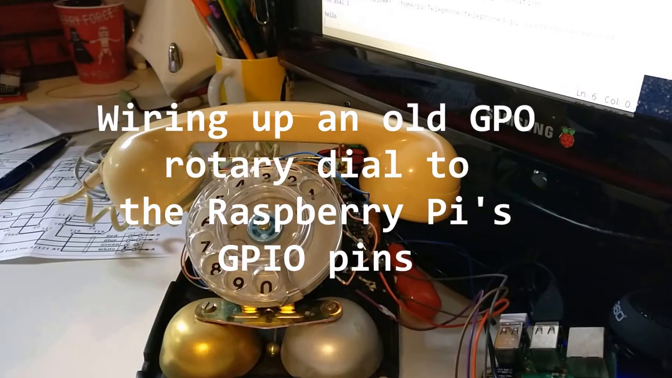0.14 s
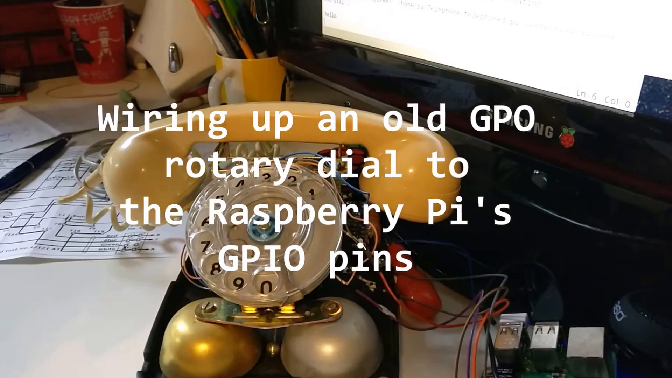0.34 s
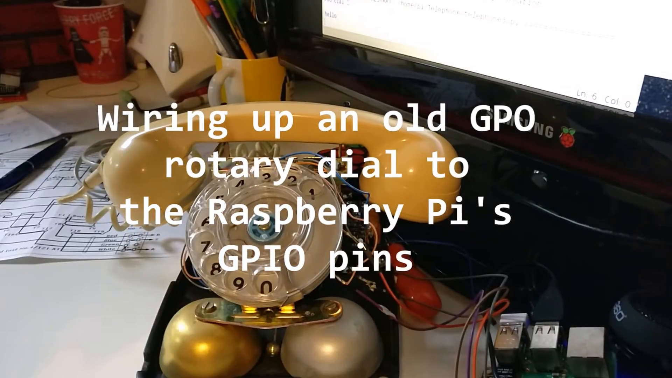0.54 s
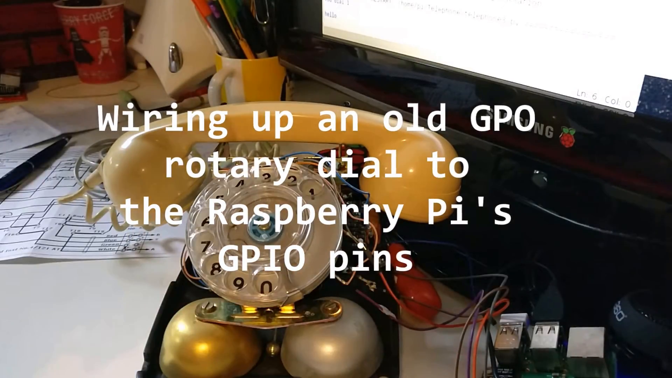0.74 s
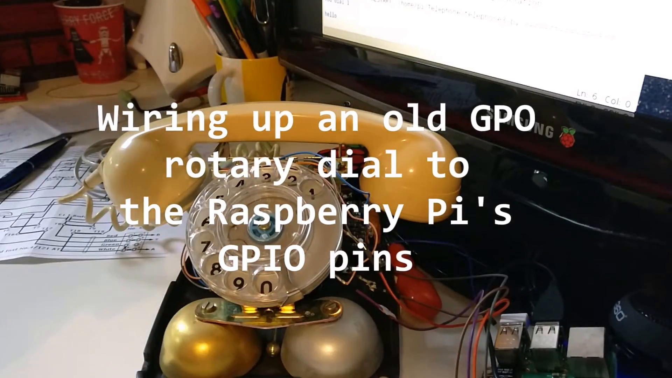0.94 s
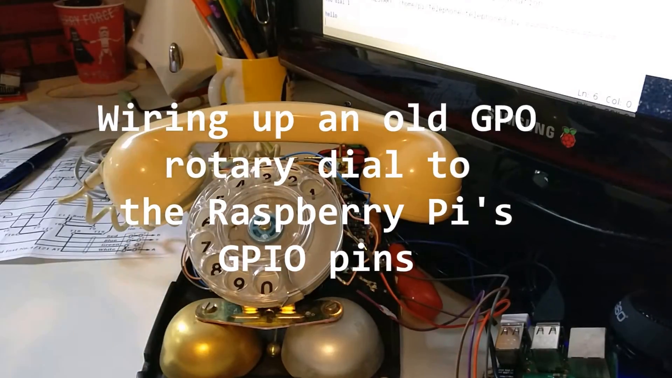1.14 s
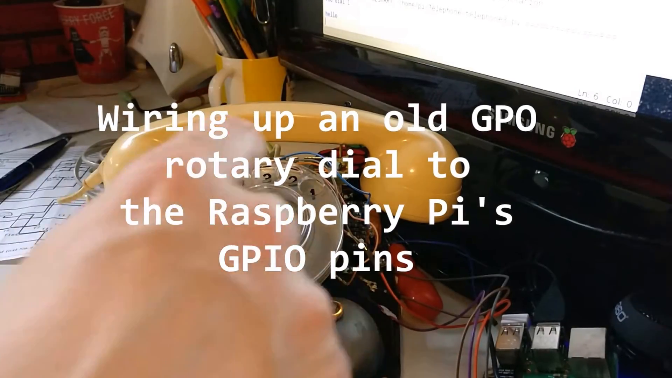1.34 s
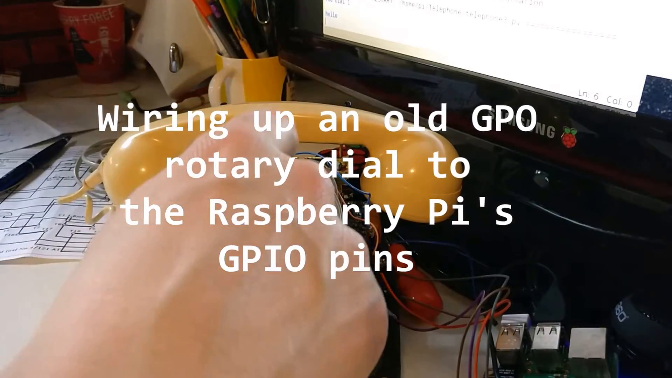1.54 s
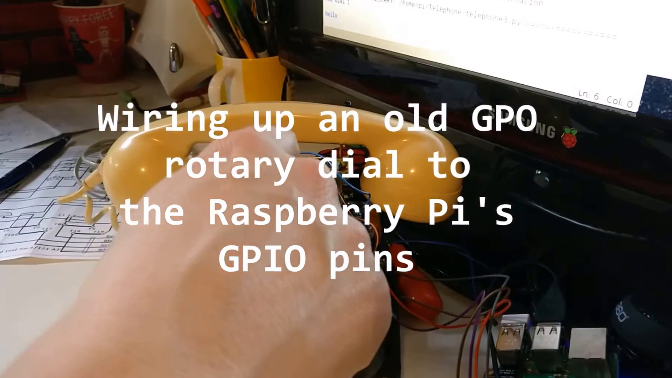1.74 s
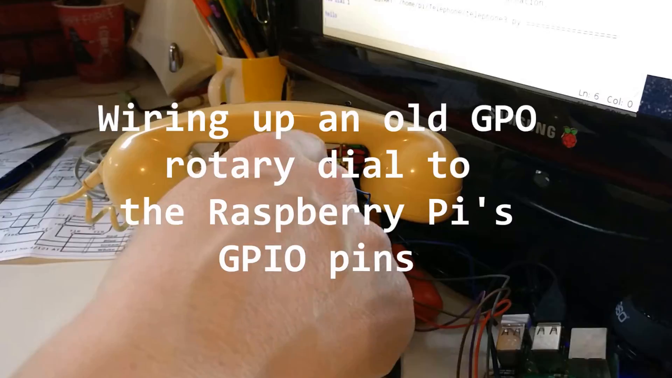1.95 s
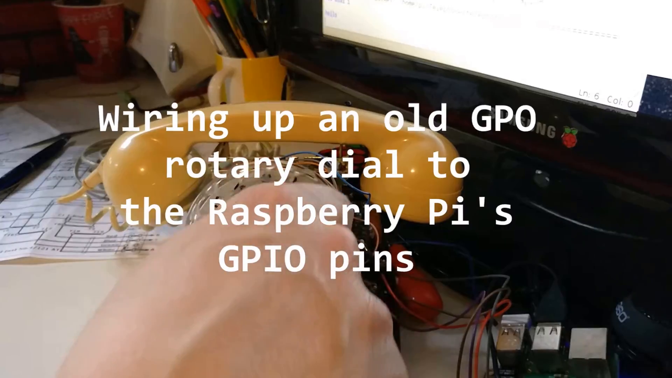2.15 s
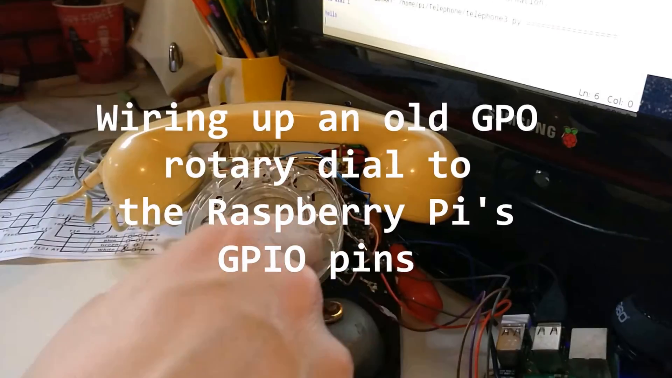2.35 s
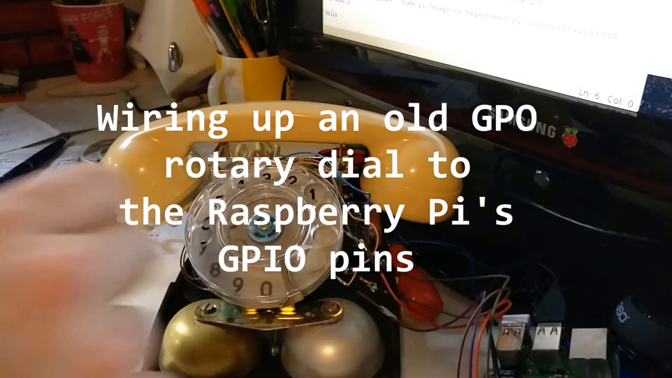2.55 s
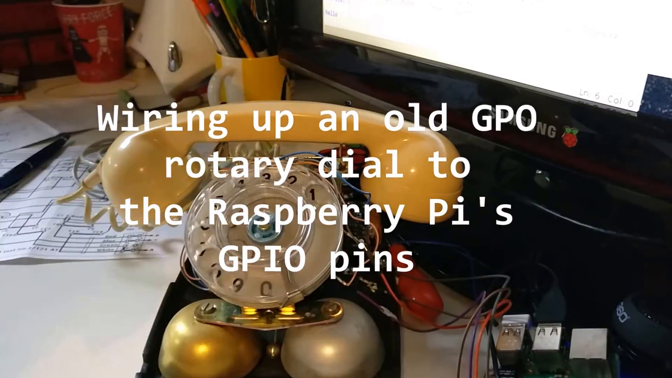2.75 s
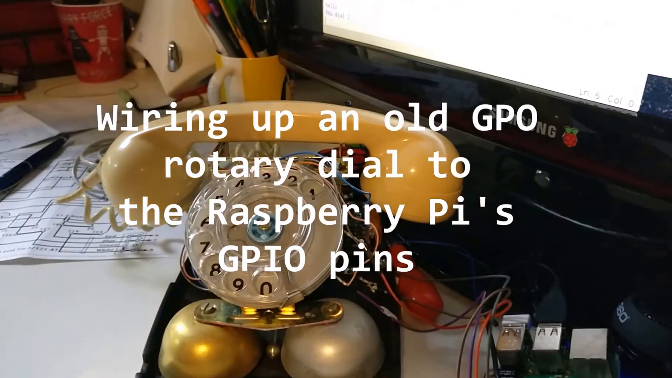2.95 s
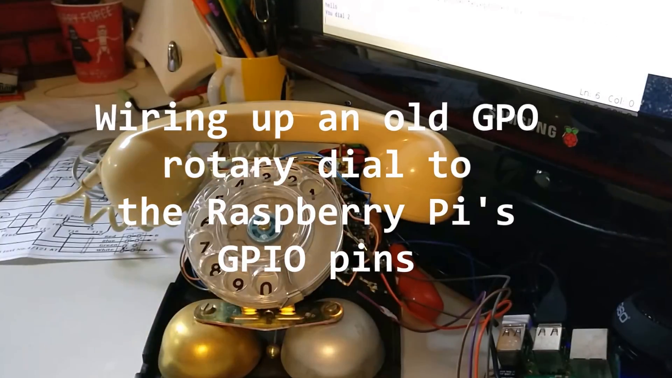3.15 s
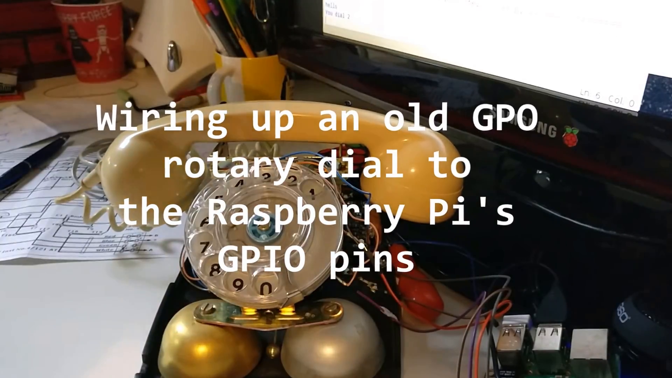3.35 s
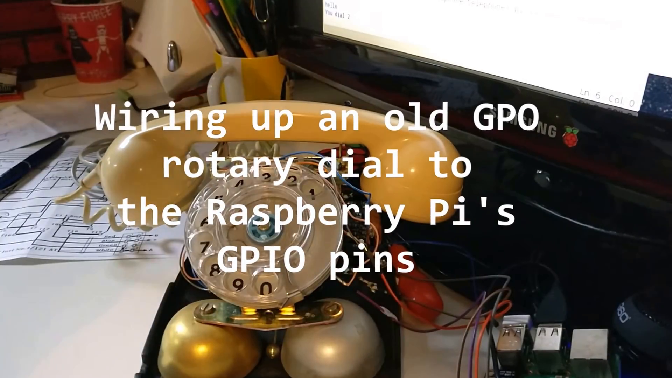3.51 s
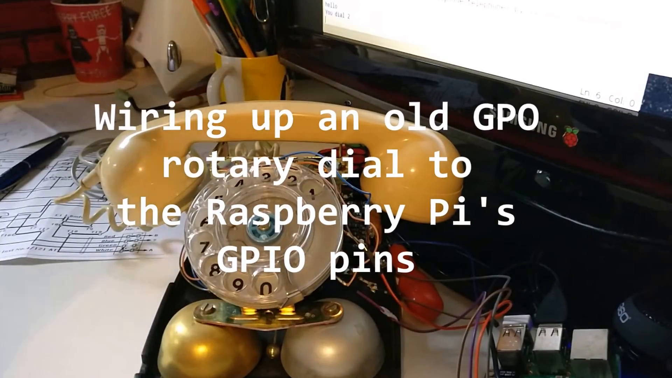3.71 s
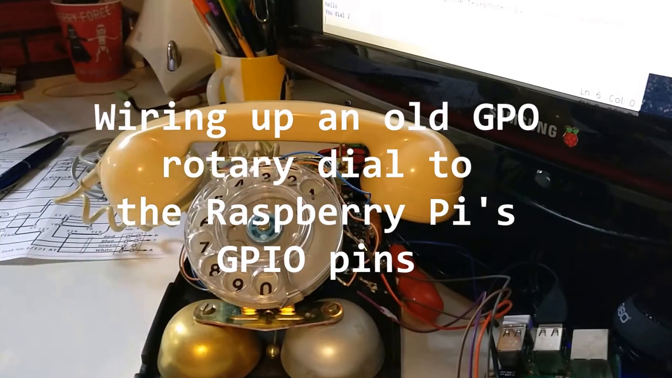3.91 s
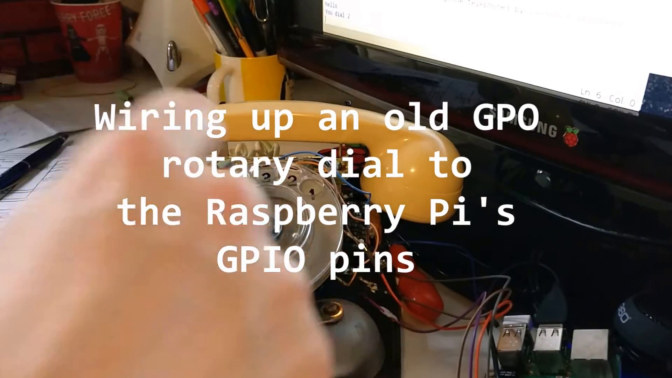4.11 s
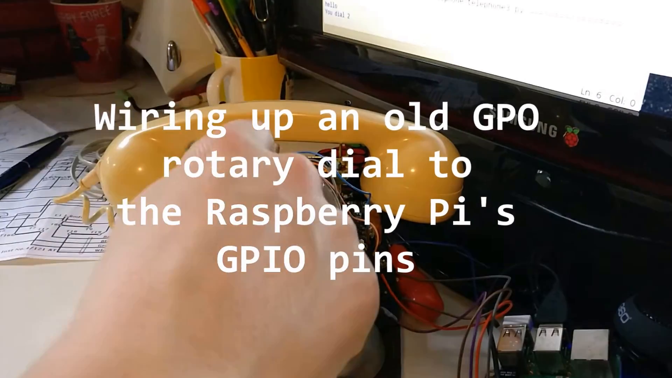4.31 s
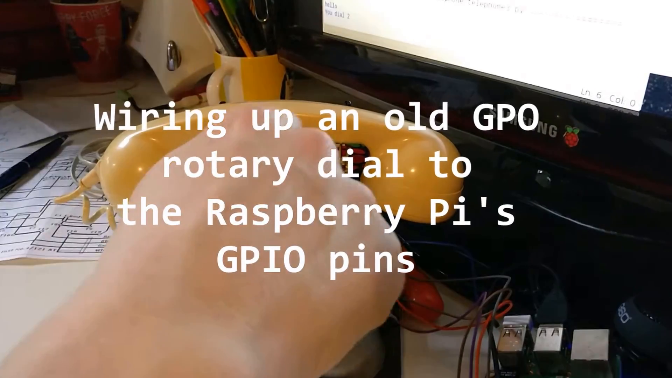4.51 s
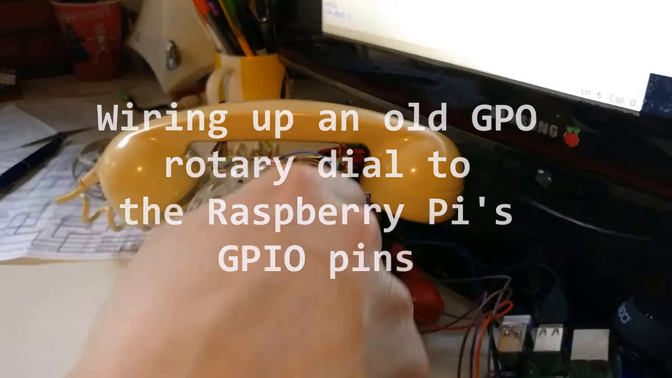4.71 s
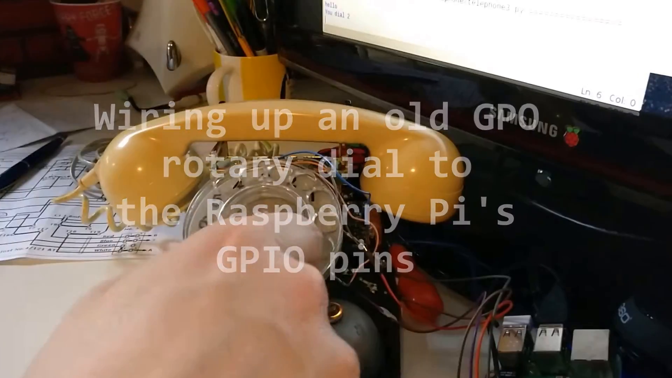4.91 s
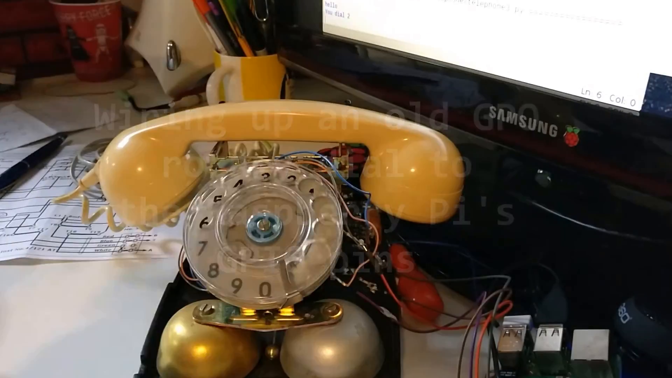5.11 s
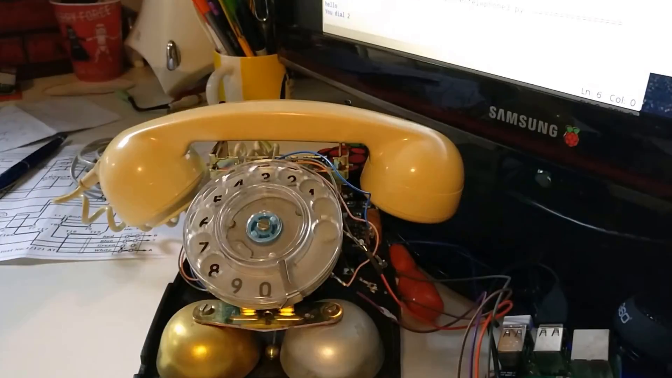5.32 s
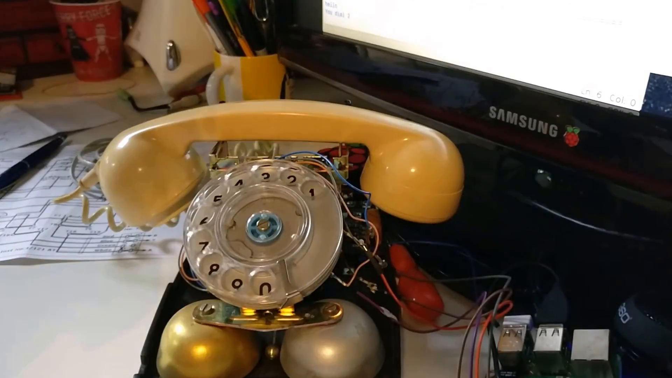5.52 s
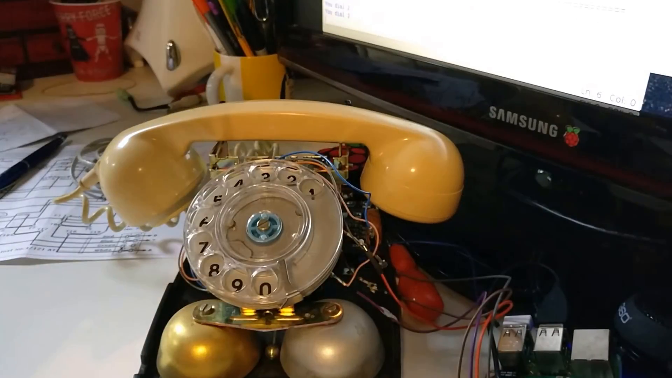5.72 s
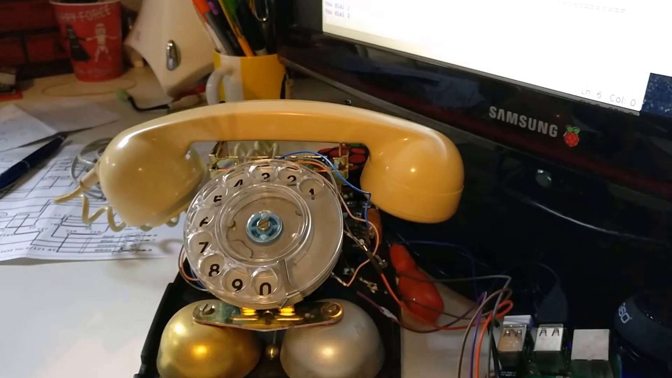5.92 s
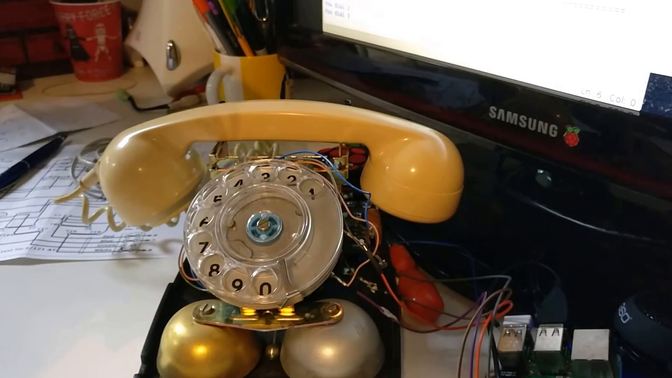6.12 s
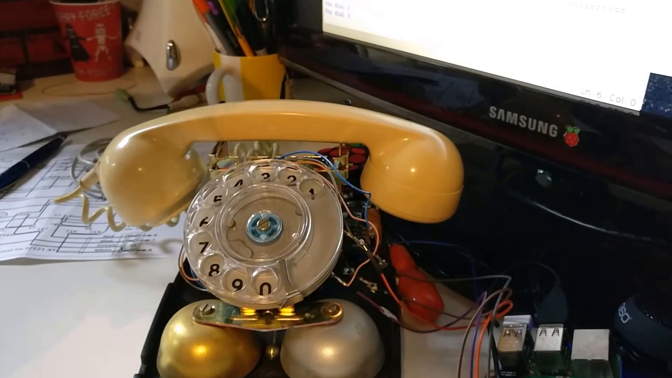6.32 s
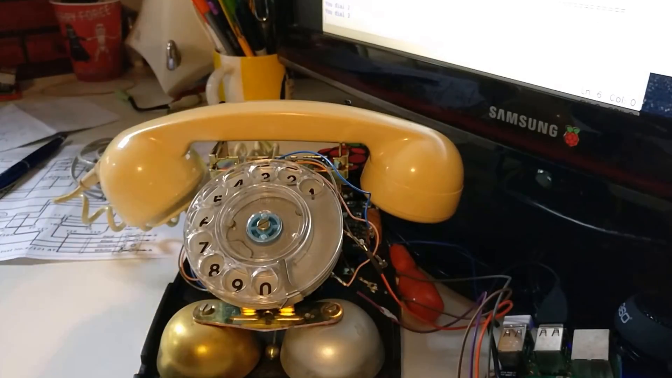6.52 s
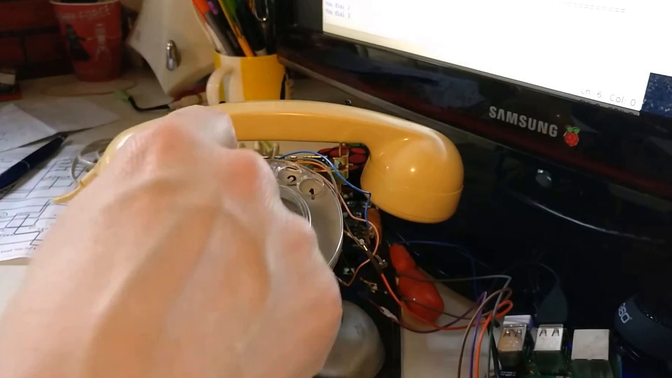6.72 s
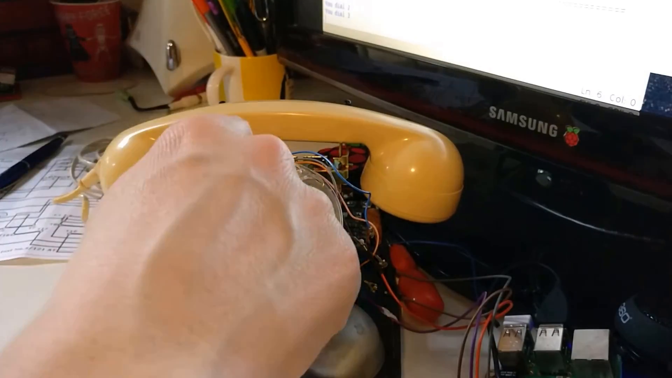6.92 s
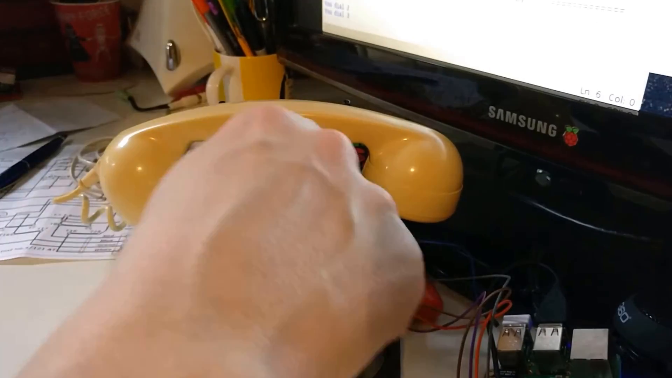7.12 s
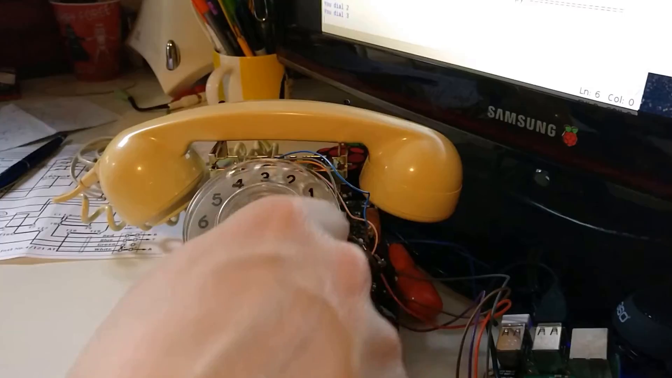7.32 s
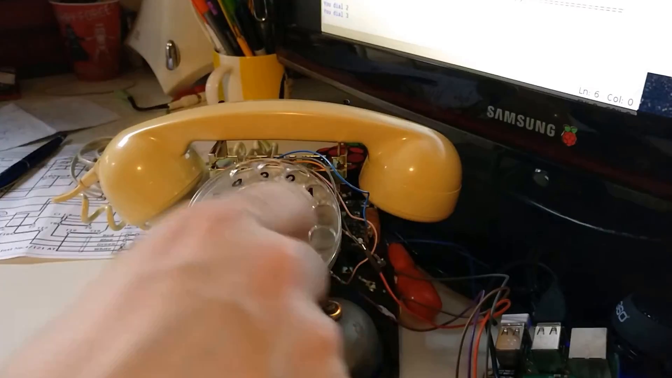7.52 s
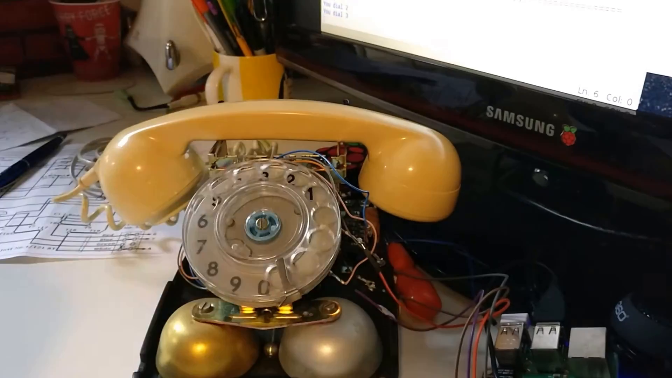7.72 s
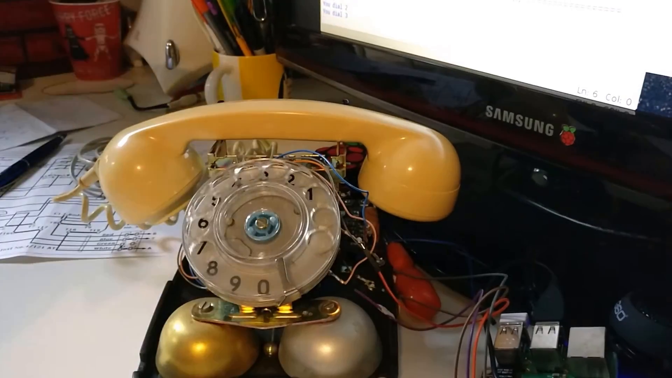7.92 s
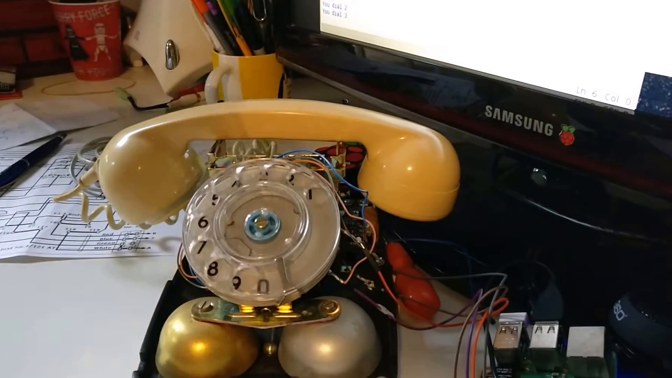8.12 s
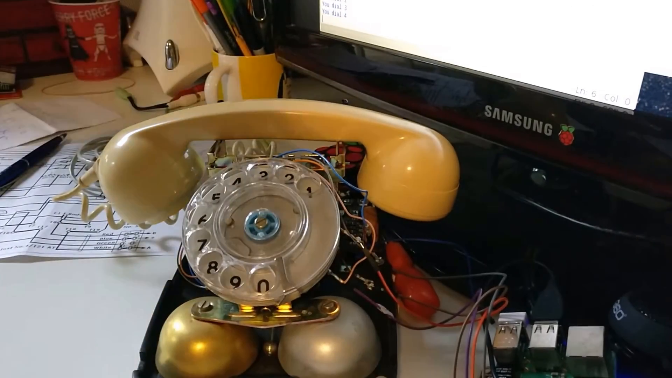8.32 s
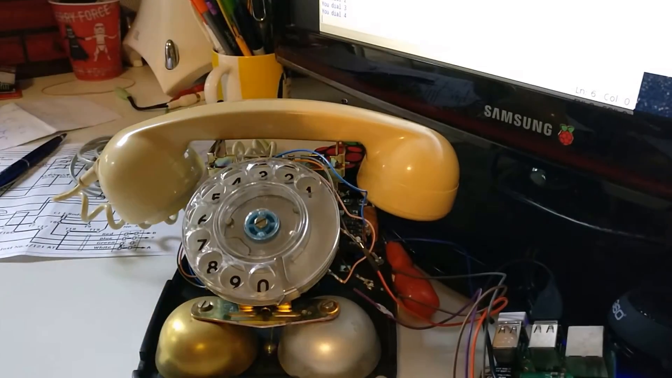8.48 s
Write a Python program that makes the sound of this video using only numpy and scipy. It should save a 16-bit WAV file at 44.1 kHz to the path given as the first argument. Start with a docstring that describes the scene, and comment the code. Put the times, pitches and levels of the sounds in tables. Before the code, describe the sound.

A quiet small room with low rumble and faint hiss, heard close to an opened rotary telephone on a desk. At 0 s the wheel rattles lightly to rest, with faint handling rustles at 0.4 and 1.4 s. At 1.85 s a palm settles dully and a finger knocks into the wheel near 2 s. A bright spring snap at 2.15 s leads into quick ratchet ticks and a hard stop at 2.34 s. Released at 2.5 s, the gears whirr with rapid fine ticks and a low steady hum, clacking home at 3 s and rocking briefly. After a pause, the second digit starts with a palm at 4.4 s, winds at 4.7-4.9 s and whirrs from 5.06 to 5.63 s. The third, with a firmer palm thump at 6.9 s, winds at 7.2-7.47 s, runs back from 7.6 to 8.3 s, clacks and settles.

```python
"""Three digits are dialled on an opened rotary telephone on a desk in a quiet room with low rumble and faint hiss.
At first the wheel rattles to rest, as filtered bursts of noise. For each digit a palm settles as dull noise,
a finger lands in the wheel, a contact spring snaps over, and the ratchet ticks, as ringing noise bursts, to the stop.
Released, the wheel runs home: the gears whirr as chattering noise, the governor ticks twice a turn and hums through
the desk as harmonics of its rotation, and the wheel clacks home and rocks twice in its play."""
import sys
import numpy as np
from scipy import signal
from scipy.fft import rfft, irfft
from scipy.io import wavfile
from scipy.ndimage import uniform_filter1d

SR = 44100
rng = np.random.default_rng(int(sys.argv[2]) if len(sys.argv) > 2 else 0)


def to_wav(s):
    """Save 16-bit WAV."""
    ch = np.atleast_2d(s).T  # columns
    pcm = np.round(np.clip(ch, -1, 1) * 32767)  # PCM
    wavfile.write(sys.argv[1], SR, pcm.astype(np.int16))


N = 377055
TIME = np.arange(N) / SR  # s
BINS = np.fft.rfftfreq(N, 1 / SR)  # Hz

# Resonances and hollows of wheel, frame and case, and a bright peak near 15.3 kHz mostly on the right:
# centre_hz, width_hz, left_db, right_db
BODY_MODES = [(302, 40, 0.9, 3.3), (404, 64, -2.7, -3.0), (497, 69, 0.3, 3.5), (605, 51, -1.3, -6.8),
              (714, 102, -0.5, 2.7), (940, 170, 3, 9), (1033, 150, 5, -1), (1263, 129, -4.6, -4.9),
              (1434, 169, -2.3, -4.5), (1697, 215, 6.8, 6.8), (1909, 114, 2.1, 4.7), (2313, 113, 6.0, 0.9),
              (2582, 333, 6.4, 4.1), (3280, 1448, 8.2, 2.4), (3871, 231, -4.0, -3.4), (4248, 491, 3.1, 2.3),
              (5337, 647, 0.8, 4.3), (6087, 535, 2.2, 3.4), (6549, 210, -2.9, -2.0), (6822, 282, 3.2, 3.1),
              (7693, 715, -3.6, -3.6), (9154, 541, -2.3, -2.3), (9566, 403, -1.4, 3.2),
              (9611, 5878, 4.2, 0.4), (11269, 563, -3.8, -2.1), (12395, 464, -3.7, -1.8),
              (13551, 289, -1.5, 2.5), (15323, 587, 1.0, 7.5)]
# Broad colour of the gear teeth in contact: pitch_hz, left_db, right_db
WHIRR_COLOUR = [(150, -12, -16), (260, -11, -22), (430, -17.5, -18), (556, -16, -11.5), (833, -8, -6),
                (1400, -7, -11.5), (1820, -7, -3.5), (3460, -9.5, -4.5), (5900, -6, -5.5), (7800, -12, -13),
                (10000, -4, -13), (11800, -5, -19), (14900, -4, -17)]
# Broad colour of pawl, spring and bearing: pitch_hz, left_db, right_db
RATCHET_COLOUR = [(150, -20, -20), (250, -32, -39.5), (395, -17, -8), (580, -12, -16), (864, -6, 3.5),
                  (1380, -6, -18.5), (1820, -4.5, -3), (3250, -4, 2.5), (5700, -1.5, -1.7), (8200, -5, -5),
                  (9900, 2, -7.3), (12500, -5, -14), (15500, 0.5, -8)]
# Broad colour of the contact spring and of metal cracking: pitch_hz, left_db, right_db
SNAP_COLOUR = [(150, -40, -27), (250, -25, -21), (400, -31, -16.5), (593, -12, -12), (840, -25, -6.5),
               (1380, -25.6, -18), (1900, -12, -13), (3200, -18.5, -11), (5800, -4.5, -11),
               (7400, -14.5, -7), (10000, -5, -15), (12400, -6.5, -18), (15000, -0.5, -6)]
# Broad colour of knocks: pitch_hz, left_db, right_db
KNOCK_COLOUR = [(150, -23, -11), (270, -1.5, -13.5), (430, -37, -14), (625, -6.5, -5.5), (850, -.5, .5),
                (1440, -5, -9), (1810, -2, -3), (3320, -7.5, -.5), (5600, -2.5, -2), (7500, -6, -6),
                (10000, -2.5, -9.5), (12600, 0, -9), (15200, -2, -11)]
# Bright tick of the governor's worm: pitch_hz, left_db, right_db
WORM_COLOUR = [(1500, -41, -33), (3940, -24, -29), (8350, -18, -26), (10300, -2.5, -22), (15600, -8, -6)]
# Colour of skin on the wheel: pitch_hz, left_db, right_db
SKIN_COLOUR = [(150, -12, -12), (330, -3, -3), (550, 0, -1), (850, 0, -2), (1100, -12, -14),
               (2000, -24, -24), (5000, -24, -26), (15000, -34, -36)]
# Left-right likeness of the dial's sound: pitch_hz, correlation (no unit), left_lead_rad
DIAL_LIKENESS = [(130, 1, 0), (480, .7, .1), (850, .85, 1.3), (1020, .85, 3), (1350, .2, 1.5),
                 (1650, .6, 1), (2000, .4, 2.6), (2650, .4, 2.6), (3200, .1, 1.5), (3900, .2, 2.5),
                 (4250, .7, 3.1), (4700, .25, 2.5), (5800, .3, .6), (8000, .2, .5), (15000, .2, 2)]
# Modes of the governor's brake cup: pitch_hz, t60_s, left_db, right_db
CUP_MODES = [(885, .035, 0, 4), (960, .045, -5, 13), (1040, .04, 15, -6), (1136, .035, 6, -6),
             (1192, .03, 1, -8), (2320, .035, -3, -12)]
# Modes of the case on the desk: pitch_hz, decay_s, level_db
CASE_MODES = [(116, .027, 0), (170, .03, -8), (203, .03, -8), (345, .022, -25), (715, .018, -20)]
# Colour of the desk under a hand: pitch_hz, level_db
DESK_COLOUR = [(30, -22), (60, -4), (88, -7), (116, 9), (145, -10), (190, -8), (270, -13.5), (450, -16),
               (800, -13), (1500, -27), (4000, -71)]
# Colour of the room background: pitch_hz, relative level_db per Hz
AIR_COLOUR = [(12, -37), (20, -12.5), (32, 3), (49, -2.5), (61, -7.5), (70, -15), (101, -11.5), (158, -17),
              (301, -23.5), (367, -31), (399, -29.5), (698, -30.5), (3630, -31.5), (8180, -40.5),
              (16000, -31.5)]
# Left-right likeness of the room background: pitch_hz, correlation (no unit)
AIR_LIKENESS = [(60, 0.75), (180, 0.15), (550, 0.13), (1650, 0.055), (4970, -0.041), (15000, 0.1)]
# Reverberation of the room: pitch_hz, t60_s, tail_db
ROOM_DECAY = [(120, 0.8, -2), (604, 0.37, 3.5), (980, 0.5, 1), (1810, 0.43, 1), (2900, 0.32, 1.5),
              (5900, 0.33, -1), (15300, 0.18, 3.5)]

# All event levels below are relative: each source sets its own gain.
# Hand settling on the telephone before each digit: start_s, length_s, rumble_db, desk_thump_db
RESTS = [(1.85, .12, -67, -64), (4.4, .15, -62.5, -61), (6.919, .15, -55.5, -49)]
# Finger dropping into its hole and bouncing once: start_s, level_db, desk_thump_db, bounce_after_s
TOUCHES = [(1.9784, -25, -60, .041), (4.5537, -25, -45.5, .046), (7.0959, -25, -57, .0264)]
# Fingertip tapping and sliding on the wheel: start_s, length_s, level_db
BRUSHES = [(2.04, .1, -61), (4.391, .02, -70), (4.451, .01, -62), (4.6, .07, -69), (6.908, .015, -69),
           (6.964, .008, -67), (7.13, .06, -63)]
# Wheel wound to the finger stop: leaves_home_s, first_tooth_s, time_per_tooth_s, stop_s, stop_db
PULLS = [(2.149, 2.1601, .0187, 2.3419, -20), (4.6948, 4.7372, .0177, 4.9105, -20),
         (7.1926, 7.2692, .01786, 7.4714, -20)]
# Wheel running home: finger_slips_s, gears_catch_s, last_cam_clack_s, home_s, hum_hz (two beats a turn)
RUNS = [(2.5135, 2.5506, 2.968, 2.9886, 124.3), (5.0605, 5.0784, 5.6061, 5.6258, 124.3),
        (7.6227, 7.6532, 8.2607, 8.293, 124.5)]
# Wheel rocking in its play once home: start_s, level_db, second_after_s, second_db
SETTLES = [(.0472, -39.5, .045, -46.5), (3.0974, -41.5, .046, -53), (5.7364, -33.5, .028, -43.5),
           (8.4038, -39, .019, -44)]
# Light knocks on case and wheel: start_s, level_db, desk_thump_db, decay_s
NUDGES = [(.0024, -48, -50, .024), (2.4577, -40.5, -71, .0071), (2.484, -47, -72, .005),
          (2.526, -42, -68, .005), (4.898, -27.5, -56, .007), (4.944, -41, -62, .005),
          (7.025, -47, -46, .0025), (7.0498, -44, -54, .0045), (7.2445, -40, -66, .002),
          (7.459, -29, -60, .006), (7.607, -46, -70, .005), (8.281, -25, -52, .005)]
# Rustles of handling nearby: start_s, level_db, rise_s, fade_s, centre_hz, width_hz
RUSTLES = [(.04, -66, .005, .2, 2750, 1300), (.397, -63, .005, .015, 2750, 1000),
           (1.418, -69, .004, .015, 3500, 5000), (3.855, -65, .045, .018, 11000, 11000)]

# Blows that every run shares: level_db, desk_thump_db, decay_s
SLIP, CATCH = (-40, -60, .007), (-33.5, -53, .0098)
LAST_CLACK, HOME = (-28, -52, .009), (-20.8, -37, .0063)
TOUCH_DECAY_S, BOUNCE_DB = .0052, -13.5
STOP_THUMP_DB, STOP_DECAY_S = -51, .0068
SETTLE_DECAY_S, SETTLE_THUMP_DB = .019, -26

# The gears speed up just before they catch, grow louder towards home and stop dead
GEARS_DB, GEARS_GROWTH_DB = -38.1, 2.7
GEARS_LEAD_S, GEARS_RISE_S, GEARS_FADE_S = .035, .038, .006
# The governor starts a fraction flat; its hum weakens as the spring unwinds
SPIN_UP_S, START_FLAT = .05, .04
HUM_DB, HUM_SAG_DB = -40.8, -1.8
HUM_DELAY_S, HUM_RISE_S, HUM_FADE_S = .002, .03, .022
# Time per lobe of the pulse cam, and how it checks the governor near home
CAM_S, CAM_BRAKE_DB, CAM_BRAKE_REACH_S = .096, -9, .17

TOOTH_DB, TOOTH_GROWTH_DB, TOOTH_SPREAD_DB, FIRST_TOOTH_DB = -27.6, 2, 1, -4.5
RUB_DB, RUB_GROWTH_DB, RUB_FADE_S, SLACK_RUB_DB = -46, 3, .04, -53
# A faint noise swells just before the wheel leaves home, and fades while it rests on the stop
FAINT_DB, FAINT_LEAD_S, FAINT_EASE_DB = -61, .03, -8
SNAP_DB, STOP_CRACK_DB, HOME_CRACK_DB = -14.3, -26, -23
HOLD_DB, HOLD_EASE_DB, PUSH_DB = -60.5, -2.5, -59.5
HAND_RISE_S, HAND_FADE_S, PALM_HZ = .012, .03, 160
AIR_DB = -65
EDGE_HZ = 15850


def amp(db):
    """Decibel law: a level becomes an amplitude gain."""
    return 10 ** (np.asarray(db) / 20)


def unit(x):
    """Normalisation: the signal is scaled to rms 1."""
    return x / np.sqrt(np.mean(x ** 2) + 1e-20)


def read(points, hz, axis=1):
    """Interpolation: one table column is joined by straight lines over log frequency."""
    table = np.array(points, float)
    return np.interp(np.log(hz + 1), np.log(table[:, 0] + 1), table[:, axis])


def wander(hz):
    """Low-passed noise: a slow random variation of rms 1, up to about hz."""
    return unit(irfft(rfft(rng.standard_normal(N)) / (1 + (BINS / hz) ** 4), N))


def noise_pair(likeness, gain=1, lead=0):
    """Partial coherence: stereo noise correlated as the table says, the left ahead by lead radians."""
    same = np.clip(read(likeness, BINS), -1, 1)
    left, other = rfft(rng.standard_normal((2, N)))
    right = same * left * np.exp(-1j * lead) + np.sqrt(1 - same ** 2) * other
    return unit(irfft(np.array([left, right]) * gain, N))


def add(mix, start_s, sound):
    """Superposition: a sound is added to the mix from its start time."""
    part = mix[max(round(start_s * SR), 0):][:len(sound)]
    part += sound[:len(part)]


def burst(rise, decay):
    """Contact envelope: a chattering contact rises quickly to 1, then decays exponentially (s)."""
    t = TIME[:SR // 4]
    shape = (1 - np.exp(-(t / rise) ** 2)) * np.exp(-t / decay)
    return shape / shape.max()


def stroke(start, end, rise, fade, growth_db=0):
    """Sustained contact: a movement's gain swells, changes steadily in level, then dies away (s)."""
    length = end - start
    t = TIME[:round((length + 8 * fade) * SR)]
    shape = (1 - np.exp(-(t / rise) ** 2)) * np.exp(-np.maximum(t - length, 0) / fade)
    gain = np.zeros(N)
    add(gain, start, shape * amp(growth_db * np.minimum(t / length, 1)))
    return gain


def ring(force, colour, size=4096):
    """Source and filter: tiny random impacts of the given strength excite the telephone's resonances."""
    hz = np.fft.rfftfreq(size, 1 / SR)
    db = np.array([read(colour, hz, axis=1), read(colour, hz, axis=2)])
    for centre, width, left_db, right_db in BODY_MODES:
        db += np.outer([left_db, right_db], 1 / (1 + (2 * (hz - centre) / width) ** 2))
    log_gain = np.log(amp(np.hstack([db, db[:, -2:0:-1]])))
    # minimum phase: the resonances ring after the impact, never before
    response = np.fft.ifft(np.exp(np.conj(signal.hilbert(log_gain)))).real
    response = unit(response) / np.sqrt(size)
    impacts = force * noise_pair(DIAL_LIKENESS, lead=read(DIAL_LIKENESS, BINS, axis=2))
    return signal.oaconvolve(impacts, response, axes=1)[:, :N]


def shifting(x, depth_db, patch_hz=330, patch_s=.07):
    """Moving contact: as other spots touch, each resonance swells and fades in its own time."""
    z = signal.stft(x, nperseg=512)[2]
    field = rng.standard_normal(z.shape[1:])
    # smooth the random gains over frequency bins, then over time frames
    for axis, span in ((0, patch_hz * 512 / SR), (1, patch_s * SR / 256)):
        field = uniform_filter1d(field, max(round(span), 1), axis)
        field = uniform_filter1d(field, max(round(span / 2), 1), axis)
    return signal.istft(z * amp(depth_db * unit(field)), nperseg=512)[1][:, :N]


def governor_turns(waver=0.0062):
    """Speed regulation: the governor spins up, holds near 62 turns a second, and its turns are counted."""
    hz = np.zeros(N)
    for slip, catch, _, _, hum_hz in RUNS:
        running = TIME >= slip
        hz[running] = hum_hz * (1 - START_FLAT * np.exp(-(TIME[running] - catch) / SPIN_UP_S))
    return np.cumsum(hz / 2 * (1 + waver * wander(17.5))) / SR


def gear_drive():
    """Driving force: the strength of the gear train while the wheel runs home."""
    return amp(GEARS_DB) * sum(
        stroke(catch - GEARS_LEAD_S, home, GEARS_RISE_S, GEARS_FADE_S, GEARS_GROWTH_DB)
        for _, catch, _, home, _ in RUNS)


def cam():
    """Periodic load: the pulse cam's lobes (1 on each, 0 between) and the time to the nearest homing (s)."""
    homes = np.array([home for _, _, _, home, _ in RUNS])
    from_home = abs(TIME - homes[:, None]).min(0)
    return (1 + np.cos(2 * np.pi * from_home / CAM_S)) / 2, from_home


def whirr(turns, decay=0.0011, scrape=.35, turn_db=.8, beat_db=.5, cam_db=.9, uneven_db=.4, shift_db=1.3):
    """Amplitude modulation: chattering, scraping teeth swell with governor turns, weights and cam lobes."""
    impacts = (rng.random(N) < 900 / SR) * rng.uniform(.2, 1, N)  # about 900 a second
    # the impacts add as energy, hence the root
    chatter = np.sqrt(signal.lfilter([1], [1, -np.exp(-2 / (decay * SR))], impacts))
    swell_db = turn_db * np.cos(2 * np.pi * turns) + beat_db * np.sin(4 * np.pi * turns)
    swell_db += cam_db * cam()[0] + uneven_db * wander(35)
    force = unit(np.hypot(unit(chatter), scrape) * amp(swell_db))
    return shifting(ring(force * gear_drive(), WHIRR_COLOUR), shift_db)


def hum(turns, once_db=-26, thrice_db=-32, fifth_db=-28, waver_db=0.95):
    """Rotating imbalance: two weights shake the case twice a turn; cam lobes check them more near home."""
    angle = 2 * np.pi * turns
    orders = np.sin(2 * angle) + amp(once_db) * np.sin(angle)
    orders += amp(thrice_db) * np.sin(3 * angle) + amp(fifth_db) * np.sin(5 * angle)
    shake = sum(stroke(catch + HUM_DELAY_S, home, HUM_RISE_S, HUM_FADE_S, HUM_SAG_DB)
                for _, catch, _, home, _ in RUNS)
    lobe, from_home = cam()
    brake_db = CAM_BRAKE_DB * lobe * np.exp(-from_home / CAM_BRAKE_REACH_S)
    return np.sqrt(2) * orders * shake * amp(HUM_DB + brake_db + waver_db * wander(48))


def governor(turns, worm_db=-6.5, uneven_db=2.8, early_turn=.23, early_db=-2.5, tick_rise=.0012,
             tick_decay=.0028, grip=0.0019, cup_db=-11, shift_db=2.3):
    """Impulsive excitation: each turn the worm ticks twice and a brake shoe catches and rings its cup."""
    at, early = (np.flatnonzero(np.diff(np.floor(turns + ahead))) for ahead in (0, early_turn))
    strikes, catches = np.zeros((2, N))
    strikes[at], strikes[early] = 1, amp(early_db)
    strikes *= amp(uneven_db * rng.standard_normal(N))
    tick_energy = signal.oaconvolve(strikes ** 2, burst(tick_rise, tick_decay) ** 2)[:N]
    ticks = unit(np.sqrt(abs(tick_energy)))
    worm = amp(worm_db) * ring(ticks * gear_drive(), WORM_COLOUR)

    # the shoe catches up to 100 samples before the worm's later tick
    catches[at + rng.integers(0, 100, len(at)) - 100] = rng.uniform(.3, 1, len(at))
    t = TIME[:SR // 4]
    # the shoe grips softly, so the cup rings without a click
    modes = sum(np.outer(amp([left_db, right_db]),
                         np.sin(2 * np.pi * hz * t) * burst(grip, t60 / np.log(1000)))
                for hz, t60, left_db, right_db in CUP_MODES)
    cup = amp(cup_db) * unit(signal.oaconvolve(catches[None], modes, axes=1)[:, :N])
    # it lets go at the cam's last clack
    braking = amp(GEARS_DB) * sum(stroke(slip, clack, GEARS_RISE_S, GEARS_FADE_S, GEARS_GROWTH_DB)
                                  for slip, _, clack, _, _ in RUNS)
    return worm + shifting(cup * braking, shift_db, patch_hz=170, patch_s=.045)


def winding(tooth_db=-7, rise=0.0014, decay=0.0085, grain_db=2.5, shift_db=1.5):
    """Impact and friction: the wheel rubs through its slack, then the pawl ticks over harder rubbing."""
    ticks, rub = np.zeros((2, N))
    for (start, first, step, stop, _), (slip, *_) in zip(PULLS, RUNS):
        teeth = np.arange(first, stop - step / 2, step)
        for tooth, chance in zip(teeth, rng.standard_normal(size=16)):
            db = TOOTH_DB + TOOTH_GROWTH_DB * (tooth - start) / (stop - start)
            db += TOOTH_SPREAD_DB * chance + FIRST_TOOTH_DB * (tooth == first)
            add(ticks, tooth, amp(db + tooth_db) * burst(rise, decay))
        rub += amp(SLACK_RUB_DB) * stroke(start, first, HAND_RISE_S, HAND_FADE_S)
        rub += amp(FAINT_DB) * stroke(start - FAINT_LEAD_S, start, HAND_RISE_S, HAND_FADE_S)
        rub += amp(FAINT_DB) * stroke(stop, slip, HAND_RISE_S, HAND_FADE_S, FAINT_EASE_DB)
        rub += amp(RUB_DB) * stroke(first, stop, HAND_RISE_S, RUB_FADE_S, RUB_GROWTH_DB)
    grainy_rub = rub * amp(grain_db * wander(200))
    return shifting(ring(np.hypot(ticks, grainy_rub), RATCHET_COLOUR), shift_db)


def snaps(gain_db=-2, shiver_db=-19, shiver=0.013, crack_rise=.003, crack_decay=.005):
    """Elastic release: the contact spring snaps and shivers; metal cracks at both ends of the travel."""
    snap = np.hypot(burst(.002, .0013), amp(shiver_db) * burst(0.0034, shiver))
    crack = burst(crack_rise, crack_decay)
    force = np.zeros(N)
    for (start, _, _, stop, _), (_, _, _, home, _) in zip(PULLS, RUNS):
        add(force, start, amp(SNAP_DB) * snap)
        add(force, stop, amp(STOP_CRACK_DB) * crack)
        add(force, home, amp(HOME_CRACK_DB) * crack)
    return amp(gain_db) * ring(force, SNAP_COLOUR)


def blows():
    """Collisions: every knock of the dialling as start_s, level_db, desk_thump_db, decay_s."""
    rows = list(NUDGES)
    for start, db, thump_db, after in TOUCHES:
        rows.append((start, db, thump_db, TOUCH_DECAY_S))
        rows.append((start + after, db + BOUNCE_DB, thump_db + BOUNCE_DB, TOUCH_DECAY_S))
    for *_, stop, db in PULLS:
        rows.append((stop, db, STOP_THUMP_DB, STOP_DECAY_S))
    for slip, catch, clack, home, _ in RUNS:
        rows += [(slip, *SLIP), (catch, *CATCH), (clack, *LAST_CLACK), (home, *HOME)]
    for start, first_db, after, second_db in SETTLES:
        for at, db in ((start, first_db), (start + after, second_db)):
            rows.append((at, db, db + SETTLE_THUMP_DB, SETTLE_DECAY_S))
    return rows


def knocks(gain_db=-7, rise=0.0027, lead_db=-13, lead=0.0078):
    """Repeated impact: each knock is a light first touch, then the main rattle of the loose wheel."""
    force = np.zeros(N)
    for start, db, _, decay in blows():
        add(force, start, amp(db) * burst(rise, max(decay, .001)))
        add(force, start - lead, amp(db + lead_db) * burst(rise, lead))
    return amp(gain_db) * ring(force, KNOCK_COLOUR)


def thumps(gain_db=1, rise=.007, jolt_db=-20, jolts_per_s=45):
    """Modal response: knocks, the landing palm and jolts of the gears rock the case on the desk."""
    t = TIME[:SR // 4]
    thump = sum(amp(db) * burst(rise, decay) * np.sin(2 * np.pi * hz * t) for hz, decay, db in CASE_MODES)
    jolts = rng.standard_normal(N) * (rng.random(N) < jolts_per_s / SR)
    force = amp(jolt_db) * gear_drive() * jolts
    for start, _, db, _ in blows():
        add(force, start, amp([db + gain_db]))
    for start, _, _, db in RESTS:
        add(force, start, amp([db]))
    return signal.oaconvolve(force, thump)[:N]


def hand(lumps_db=.8):
    """Friction noise: the soft palm rumbles dully; the finger also scrapes as it holds and pushes the wheel."""
    desk = amp(read(DESK_COLOUR, BINS))
    dull = desk / np.hypot(1, BINS / PALM_HZ)
    palm = sum(amp(db) * stroke(start, start + length, HAND_RISE_S, HAND_FADE_S)
               for start, length, db, _ in RESTS)
    finger = np.zeros(N)
    for (touch, *_), (_, first, _, stop, _), (slip, *_) in zip(TOUCHES, PULLS, RUNS):
        finger += amp(HOLD_DB) * stroke(touch, slip, HAND_RISE_S, HAND_FADE_S, HOLD_EASE_DB)
        finger += amp(PUSH_DB) * stroke(first, stop, HAND_RISE_S, HAND_FADE_S)
    rumble = palm * noise_pair(DIAL_LIKENESS, dull)
    scrape = finger * noise_pair(DIAL_LIKENESS, desk)
    return amp(lumps_db * wander(20)) * (rumble + scrape)


def brushes(rise=.004, fade=.014, grain_db=2.5):
    """Soft contact: skin taps and slides on the wheel with a dull, hollow sound."""
    force = sum(amp(db) * stroke(start, start + length, rise, fade) for start, length, db in BRUSHES)
    return ring(force * amp(grain_db * wander(120)), SKIN_COLOUR)


def rustle():
    """Band-limited noise: soft rustles of handling swell and die away."""
    total = np.zeros((2, N))
    for start, db, rise, fade, hz, width in RUSTLES:
        band = 1 / (1 + (2 * (BINS - hz) / width) ** 2)
        total += amp(db) * stroke(start, start + rise, rise, fade) * noise_pair(AIR_LIKENESS, band)
    return total


def room(x, near_db=-14, tail_db=-12, build=0.0013, count=8):
    """Reverberation: a few echoes from the desk and screen, then the short tail of a small room."""
    near = np.zeros((2, SR // 2))
    delays = (SR * rng.uniform(.001, .014, (2, count))).astype(int)
    np.put_along_axis(near, delays, rng.choice([-1, 1], (2, count)), 1)
    hz, t, z = signal.stft(rng.standard_normal(near.shape), SR, nperseg=256)
    fade = np.exp(-np.log(1000) * t / read(ROOM_DECAY, hz)[:, None]) * (1 - np.exp(-t / build))
    tail_colour = amp(read(ROOM_DECAY, hz, axis=2))[:, None]
    tail = signal.istft(z * fade * tail_colour, SR, nperseg=256)[1][:, :SR // 2]
    response = amp(near_db) * near / np.sqrt(count) + amp(tail_db) * tail / np.linalg.norm(tail[0])
    return x + signal.fftconvolve(x, response, axes=1)[:, :N]


def air(gain_db=0, drift_db=0.5, lowest_hz=39):
    """Ambient noise: low rumble and faint hiss; the microphone passes no deep bass."""
    passed = 1 - 1 / (1 + (BINS / lowest_hz) ** 12)
    background = noise_pair(AIR_LIKENESS, passed * amp(read(AIR_COLOUR, BINS)))
    return amp(AIR_DB + gain_db + drift_db * wander(2.8)) * background


def scene(left_db=-3.2, right_db=-0.95):
    """Superposition: the dial in the room, the bass carried by the desk, and the background."""
    turns = governor_turns()
    dial = whirr(turns) + governor(turns) + winding() + snaps() + knocks() + hand() + brushes()
    desk = (hum(turns) + thumps()) * amp([[left_db], [right_db]])
    return room(dial) + desk + rustle() + air()


def record(dry):
    """Band limit: a low-pass filter removes what lies above the upper edge."""
    low_pass = signal.firwin(255, EDGE_HZ, window=("kaiser", 8), fs=SR)
    return signal.oaconvolve(dry, low_pass[None], "same")


dry = scene()
out = record(dry)
to_wav(out)
```